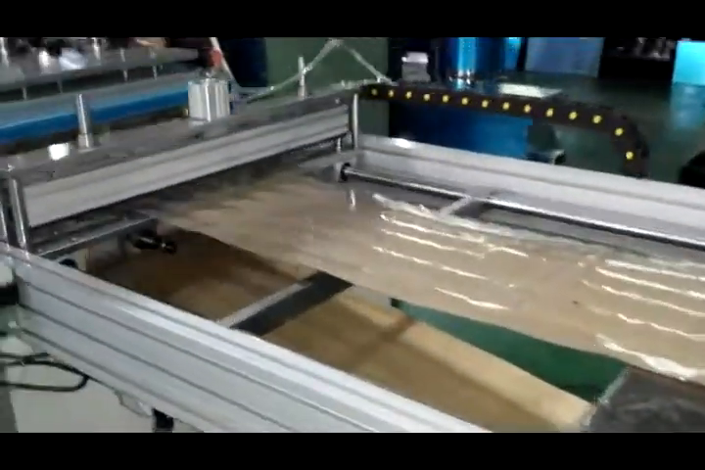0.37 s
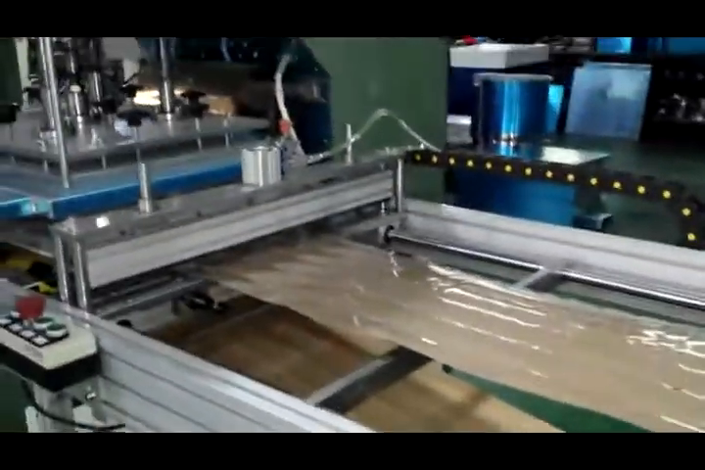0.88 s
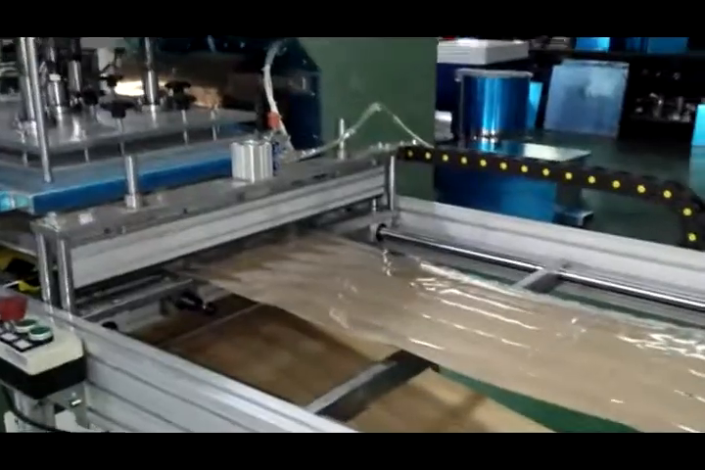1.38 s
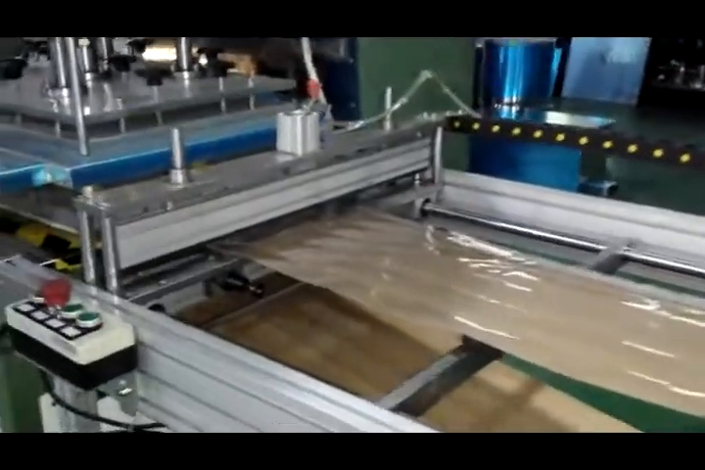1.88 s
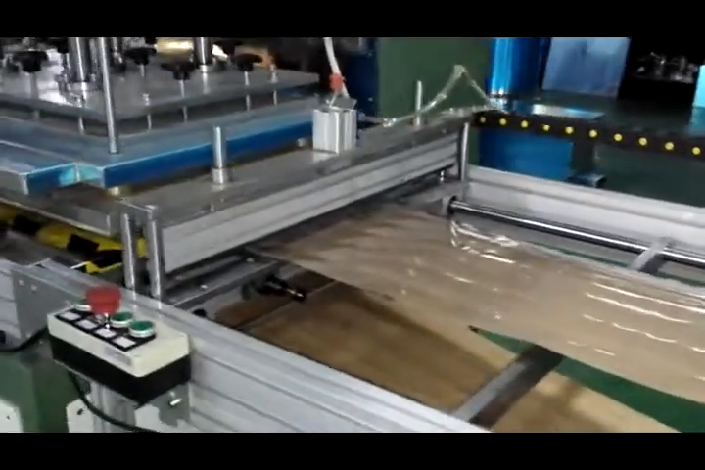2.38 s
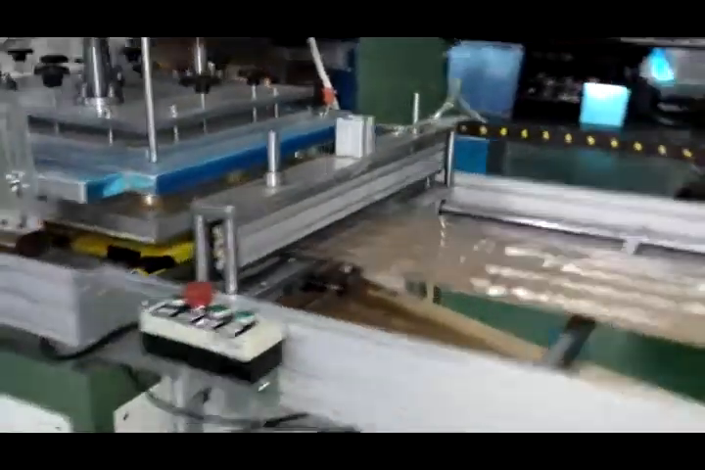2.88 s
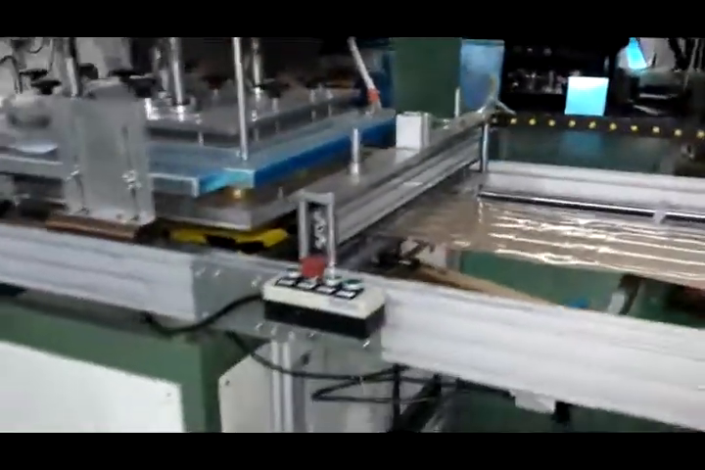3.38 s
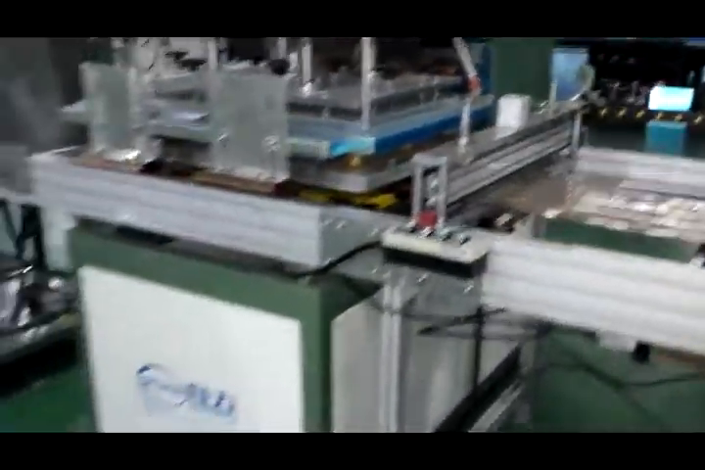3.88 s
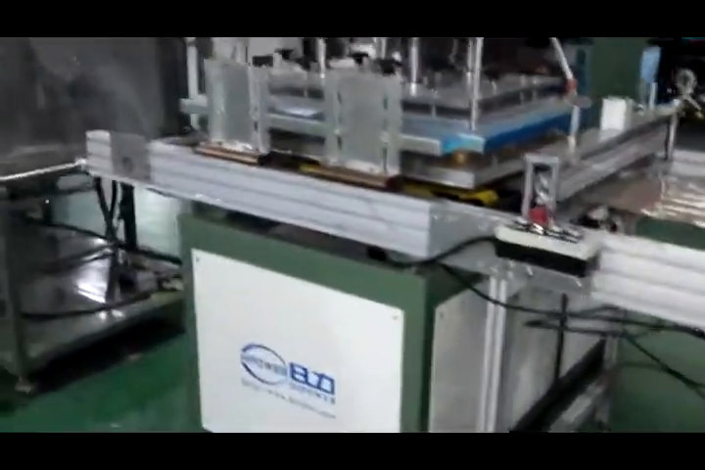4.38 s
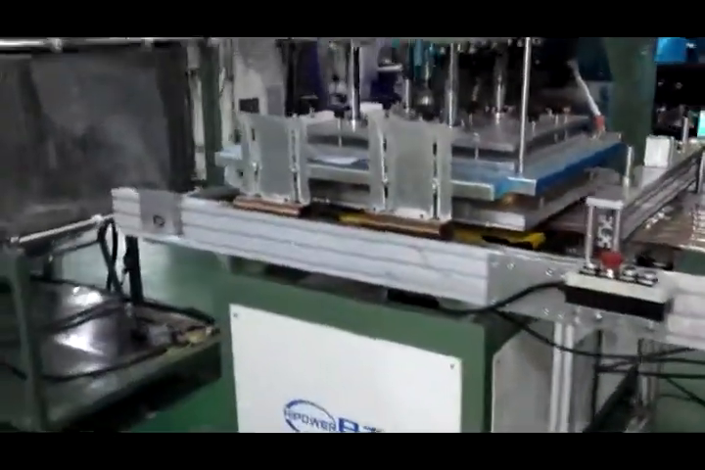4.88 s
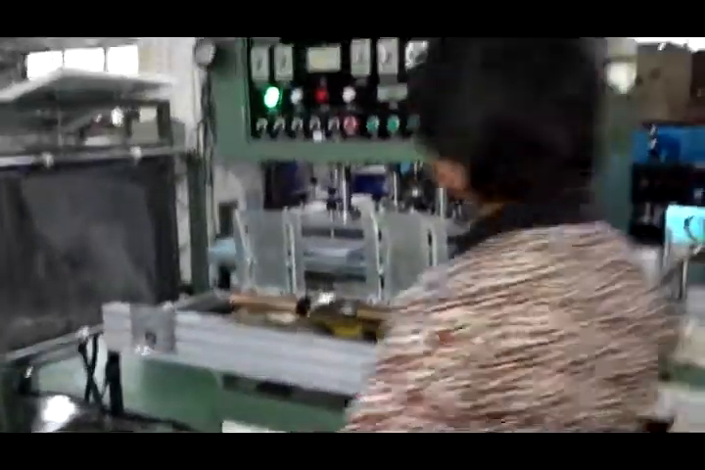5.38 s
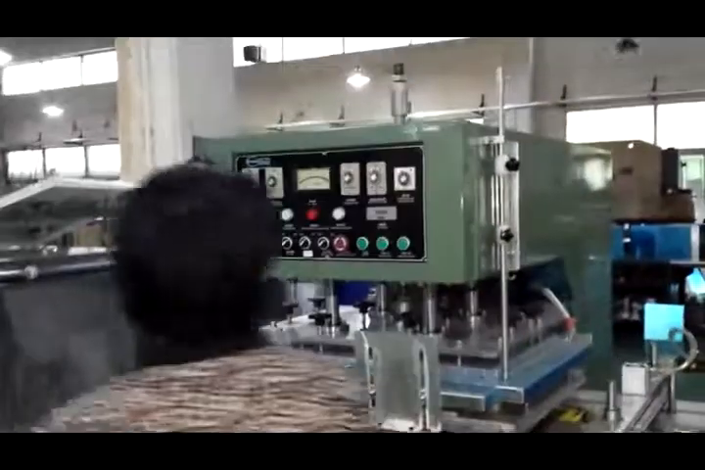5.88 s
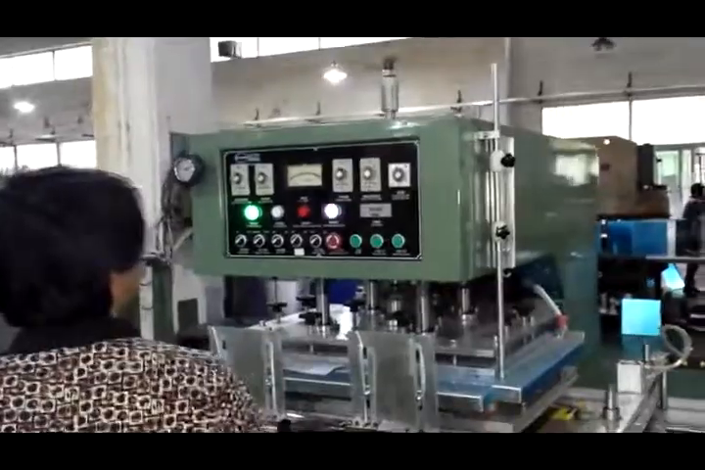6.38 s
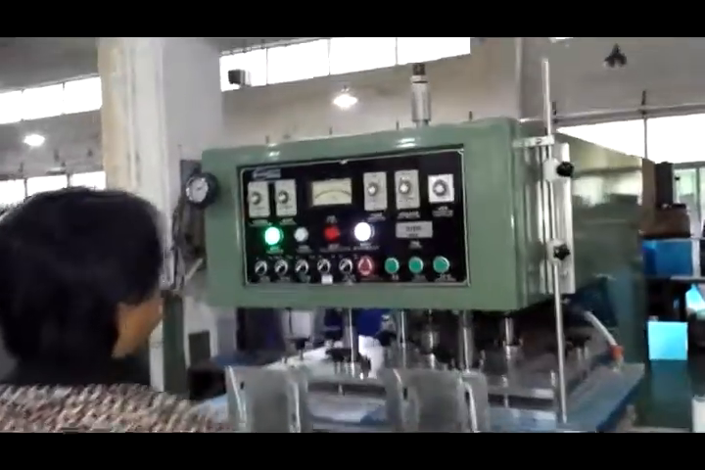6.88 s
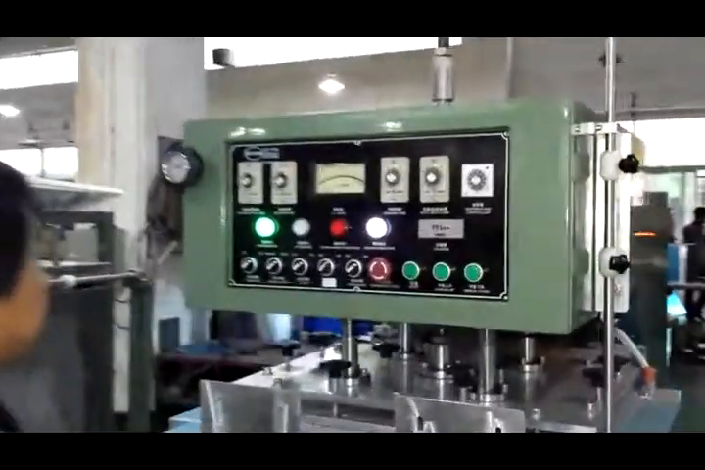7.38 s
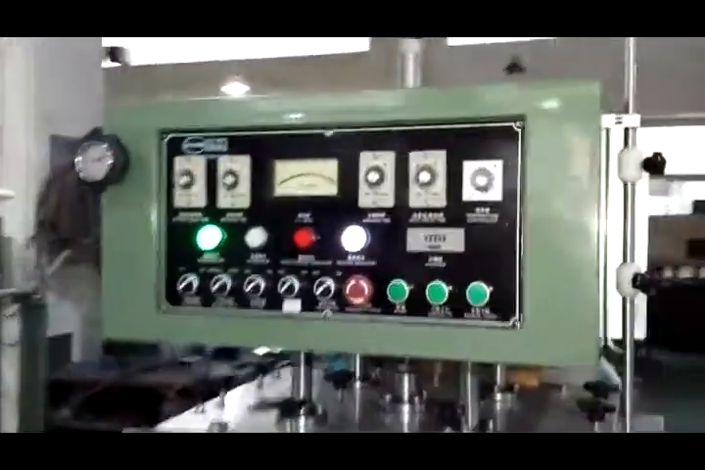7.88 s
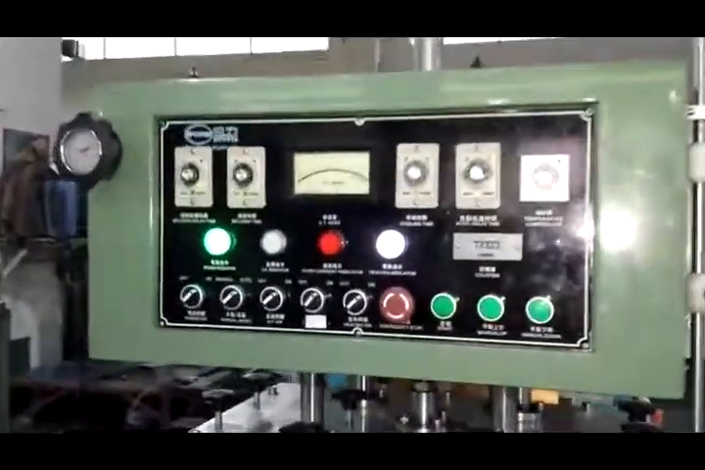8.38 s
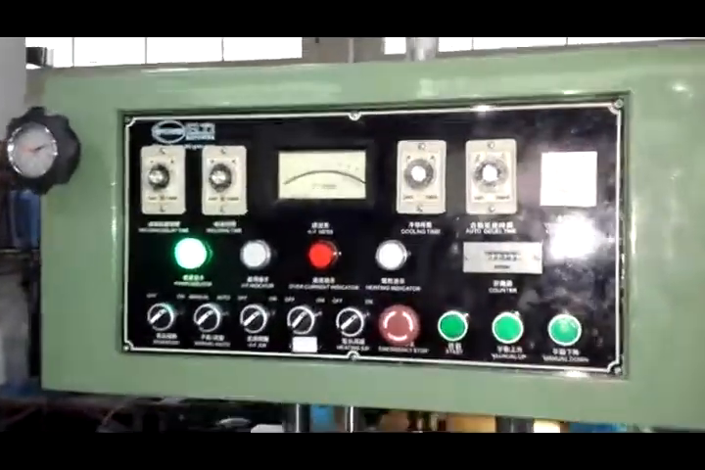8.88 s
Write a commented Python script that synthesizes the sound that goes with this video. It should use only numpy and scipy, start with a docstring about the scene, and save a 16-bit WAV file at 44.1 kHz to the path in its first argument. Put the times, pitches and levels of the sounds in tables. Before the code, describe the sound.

A loud, bright compressed-air hiss fills the foreground from the start, wavering slightly and leaning left, over the dark rumble of distant machines in a large workshop and a faint wavering mid-low motor whine. Short dull steel knocks come unevenly at about 1.0, 1.4, 1.9, 2.5 and 2.9 seconds. At 4.3 a firmer knock rattles on for nearly a second, with a soft air puff at 4.5; a lower clunk rattles at 5.2. Around 6.2 to 6.4 the hiss dips and sharp valve bursts spit, with low thumps. It turns sizzlier after 7, then from 7.3 to 8.0 a rough stick-slip cylinder groan swells as the air dies. From 8.0 to 8.6 mostly rumble and whine remain. At 8.65 a solid clunk lands, the hiss snaps back, and a brief lower groan follows through to the end at 9. Small resonant microphones make it brittle.

```python
"""A hiss of compressed air from a forming press comes first; it nearly stops for a moment, then starts again.
Place: a large workshop. The hiss is coloured noise, with bursts of air added by valve puffs.
Under it: dull knocks ringing the modes of a steel frame, a cylinder groaning as its seal sticks and slips,
a motor whine of wavering tones, and the hall rumble of far machines, a dark noise.
Two small microphones, each behind a port with a resonance of its own; peaks beyond full scale are clipped."""
import sys
import numpy as np
from scipy import signal
from scipy.fft import rfft, irfft
from scipy.io import wavfile
from scipy.ndimage import uniform_filter1d

SR = 44100
rng = np.random.default_rng(int(sys.argv[2]) if len(sys.argv) > 2 else 0)


def digitize_waveform(pressure):
    """Quantize a signal to 16-bit integers and store it at the path in sys.argv[1].

    Rows of a 2-D input are taken as channels; values are limited to [-1, 1].
    """
    field = np.atleast_2d(pressure).T
    bounded = np.clip(field, -1, 1)
    quanta = np.round(bounded * 32767).astype(np.int16)
    wavfile.write(sys.argv[1], SR, quanta)


def volts(x):
    """Linear amplitude factor 10**(x/20) for a level x in dB, scalar or array-like."""
    e = np.asarray(x, float) / 20
    return 10 ** e


N = 396900   # samples, 9 s

# Levels are those ahead of the microphone ports.
# Air jet, falters before a puff, shuts and reopens: time_s, hiss_db, top_treble_db (relative to the hiss)
JET_FLOW = [(0.0, -14, -0.5), (0.6, -15.5, -0.3), (1.35, -13.5, 0), (2.3, -16, 0), (2.7, -14.5, 0),
            (3.85, -16.3, -0.5), (4.5, -15, 0), (5.8, -16.5, 0), (6.16, -15.5, 0.5), (6.21, -18, 0),
            (6.24, -16.5, 2), (6.47, -15, -0.5), (6.64, -15.5, -2.5), (7.12, -17, 4), (7.5, -14.5, 3.5),
            (7.64, -16, 2), (7.72, -18, -7), (8.07, -29.5, -4), (8.4, -31.5, -2), (8.64, -25, -3),
            (8.7, -16.5, 0), (9.0, -16.5, -2)]
# Spectrum of the jet: frequency_hz, density_db (per Hz, relative)
JET_SPECTRUM = [(700, -21), (1600, -14.5), (1900, -7), (2600, -5), (3600, -4.5), (3850, -3.5), (5500, -4),
                (7000, -3.5), (8500, -1.5), (10500, -1), (12500, 2), (14500, 1.5)]
# Bearing of the jet: time_s, left_over_right_db
JET_BEARING = [(0, 3), (1.5, 3.5), (2.5, 2), (4.2, 1.5), (6.0, 2.5), (6.6, 3), (7.4, 2.5), (8.0, 4.5),
               (8.6, 2), (8.7, 1.5), (9, 3)]
# Valve puffs: start_s, level_db (before the decay), centre_hz, width_hz, t60_s
VALVE_PUFFS = [(4.52, -25, 2600, 1500, 1.1), (6.215, -16, 8600, 4000, .3), (6.43, -20.5, 5440, 400, 0.5),
               (6.43, -27.5, 3120, 2500, 1.3), (7.2, -30, 13200, 1200, 1.5), (7.55, -26, 2310, 1500, 1.75)]
# Knocks on the frame: start_s, blow_db (relative), struck_part_hz, rattle_t60_s
FRAME_BLOWS = [(0.98, -22, 900, 0.23), (1.385, -31, 145, .2), (1.93, -22, 890, .2),
               (2.468, -17, 1020, 0.32), (2.52, -29, 900, 0.27), (2.51, -23, 250, .15),
               (2.939, -15, 830, .15), (4.261, -25.5, 436, 0.89), (4.285, -15, 680, 0.81),
               (5.21, -18.5, 268, 1), (6.17, -27, 170, .3), (6.358, -22, 120, 0.25), (7.52, -31, 500, 0.33),
               (8.648, -22, 150, 0.6), (8.652, -15.5, 328, 0.21), (8.655, -18, 760, .15),
               (8.949, -29, 890, .15)]
# Steel frame modes: pitch_hz, level_db (relative), t60_s
FRAME_MODES = [(102, 2, .2), (135.5, 5.5, 0.13), (203, -11, .18), (267, -9.5, 0.28), (303, 0, 0.1),
               (404, 6.5, 0.11), (460, -4, 0.14), (595, -4.5, 0.067), (740, -1, 0.048), (835, -4.5, 0.084),
               (957, 0.5, 0.089), (1100, -1, 0.064), (1040, -1, .06), (1380, -5, .05)]
# Cylinder strokes, one list each: time_s, slips_per_s, level_db (rms), upper_resonances_db (relative)
CYLINDER_STROKES = [
    [(7.3, 218, -42, 7), (7.45, 230, -38, -1), (7.58, 216, -30.5, 4.5), (7.75, 204, -32.5, 2),
     (7.92, 213, -32, 3), (8.0, 204, -53, 2)],
    [(8.7, 128, -57, -3), (8.775, 125, -25, -16), (8.825, 129, -23, -6), (8.85, 129, -40, -4),
     (9.0, 130, -34, -14)],
]
# Barrel resonances: pitch_hz, width_hz, level_db (relative)
BARREL_RESONANCES = [(216, 29, -5), (263, 42, 2), (384, 54, -10), (908, 180, -1.5), (1000, 60, -4),
                     (2140, 170, -6)]
# Motor whine: time_s, level_db (rms of the upper tone, before its waver)
WHINE_LEVEL = [(0, -59), (2.1, -53.5), (2.2, -44.5), (2.9, -43.5), (3.1, -50), (3.75, -43), (3.9, -47.5),
               (4.5, -46.5), (5.9, -50), (6.7, -45), (6.9, -51), (7.65, -55), (7.8, -43), (8.4, -51),
               (9.0, -41)]
# Hall rumble: time_s, level_db, brightness_db_per_octave, lowest_band_db (its chance level, relative)
HALL_LEVEL = [(0, -33.5, 0.75, -3), (2.4, -36.5, 1.1, 5), (3.2, -34, 0.85, 1), (4.6, -35.5, 0.2, -3),
              (4.9, -37.5, 0.5, 8), (5.4, -34.5, .4, -3), (5.74, -36, -0.5, -18), (6.1, -34, 0.2, 4),
              (6.24, -35.5, -1.5, -10), (6.45, -33, -.5, -3), (6.9, -34.5, 0, -7), (7.3, -34.5, -1.1, -2),
              (7.52, -34.5, 3, 5), (7.8, -34, 2.5, 3), (8.0, -37, 0.4, 5), (8.6, -35.5, -0.6, 4),
              (8.67, -28.5, -1, -3), (9.0, -29.5, 0, 3)]
# Spectrum of the rumble: frequency_hz, density_db (per Hz, relative)
HALL_SPECTRUM = [(25, -22), (45, -21), (60, -19), (100, -2), (250, -3), (400, -6), (800, -7), (1500, -8),
                 (3000, -21)]
# Likeness of the noise at the two microphones: frequency_hz, correlation (0 to 1)
MICROPHONE_LIKENESS = [(25, .2), (60, .65), (180, 1), (530, 0.49), (1100, 0.056), (4710, 0.038),
                       (14000, .01)]
# Depth of the random patches laid over the mixed noises, part of no source: frequency_hz, depth_db (spread)
PATCH_DEPTH = [(100, 2), (600, 5.5), (1500, 3), (4000, 3), (8000, 2.5), (13000, 4)]
# Microphone ports, left then right: resonance_hz, sharpness_q, gain_db (well below the resonance)
MICROPHONE_PORTS = [(5760, 3.05, 3.5), (7750, 6.5, 2.5)]


def rms_one(x):
    """Scales a signal to an rms of 1."""
    return x / np.sqrt(np.mean(x ** 2) + 1e-20)


def in_time(rows):
    """Draws each column of a table as straight lines through its times."""
    time_s, *columns = np.transpose(rows)
    return [np.interp(np.arange(N) / SR, time_s, column) for column in columns]


def at_hz(points, hz):
    """Reads a table at the given frequencies, along a log frequency axis."""
    table_hz, values = np.array(points).T
    return np.interp(np.log(hz), np.log(table_hz), values)


def drift(corner_hz):
    """Slow chance of spread 1: coarse noise through a double one-pole low-pass."""
    step = 40   # samples between coarse points
    settle = 2000   # coarse points dropped while the filter settles
    r = np.exp(-2 * np.pi * corner_hz * step / SR)
    coarse = rng.standard_normal(N // step + 2 + settle)
    slow = signal.lfilter([1], [1, -2 * r, r * r], coarse)[settle:]
    return np.interp(np.arange(N) / step, np.arange(len(slow)), rms_one(slow))


def resonate(x, hz, width_hz):
    """Two-pole resonance with gain 1 on top."""
    r = np.exp(-np.pi * width_hz / SR)
    feed = np.array([1, 0, -1]) * (1 - r * r) / 2
    return signal.lfilter(feed, [1, -2 * r * np.cos(2 * np.pi * hz / SR), r * r], x + 1e-18)


def octave_bands(colour, centres):
    """Stereo noise of the given colour and likeness, in overlapping bands that add up to the whole."""
    hz = np.maximum(np.arange(N // 2 + 1) * SR / N, 10)
    mid, side = rfft(rng.standard_normal((2, N)))
    alike = np.clip(at_hz(MICROPHONE_LIKENESS, hz), 0, 1)
    pair = np.sqrt(1 + alike) * mid + np.sqrt(1 - alike) * side * [[1], [-1]]
    pair = volts(at_hz(colour, hz)) * pair
    pair = pair / np.sqrt(np.mean(irfft(pair, N) ** 2))
    shares = [np.interp(np.log(hz), np.log(centres), row) for row in np.eye(len(centres))]
    return [irfft(pair * share, N) for share in shares]


def dying(start_s, t60_s, rise_s):
    """Envelope that starts, rises briefly and dies away exponentially."""
    t = np.maximum(np.arange(N) / SR - start_s, 0)
    return (1 - np.exp(-t / rise_s)) * volts(-60 * t / t60_s)


def panned(x, left_db):
    """Sets left over right by left_db, shared equally between the two microphones."""
    return x * volts(np.multiply.outer([.5, -.5], left_db * np.ones(N)))


def air_jet(flutter_db=0.18, patchy_db=0.42, wander_db=0.3):
    """Turbulent hiss; the flow wanders and flutters as a whole and each band a little on its own."""
    hiss_db, top_db = in_time(JET_FLOW)
    left_db, = in_time(JET_BEARING)
    full_flow_db = -15
    dull_rise = 0.33   # dB that the dull part gains on the rest for each dB below full flow
    low_db = dull_rise * (full_flow_db - hiss_db)
    together_db = flutter_db * drift(23.0) + wander_db * drift(2.7)
    bands = octave_bands(JET_SPECTRUM, np.array([1500, 2800, 5500, 8000, 12000]))
    bands[0] = panned(bands[0], 6.0)   # the dull part arrives more from the left
    jet = 0
    for band, shift_db in zip(bands, [low_db, low_db, 0, 0, top_db]):
        jet = jet + band * volts(shift_db + together_db + patchy_db * drift(7.3))
    return panned(jet * volts(hiss_db), left_db + 0.54 * drift(6.5))


def valve_puffs():
    """Short extra bursts of air: noise that dies away, each coloured by its outlet."""
    puffs = np.zeros((2, N))
    for start_s, level_db, hz, width_hz, t60_s in VALVE_PUFFS:
        air = rms_one(resonate(rng.standard_normal((2, N)), hz, width_hz))
        puffs += volts(level_db) * dying(start_s, t60_s, 0.011) * air
    return puffs


def frame_knocks(reach_octaves=0.14, rattle_per_s=500):
    """Each knock is a blow and a dying rattle; it rings the modes nearest the part struck."""
    start_s, blow_db, part_hz, _ = np.transpose(FRAME_BLOWS)
    hits = np.round(start_s * SR).astype(int)
    rattle = (rng.random(N) < rattle_per_s / SR) * rng.standard_normal(N)
    envelopes = [volts(db) * dying(s, t60_s, 0.0019) for s, db, hz, t60_s in FRAME_BLOWS]
    knocks = np.zeros((2, N))
    for hz, level_db, t60_s in FRAME_MODES:
        near = np.exp(-.5 * (np.log2(hz / part_hz) / reach_octaves) ** 2)
        drive = 0.16 * rattle * (near @ envelopes)
        drive[hits] += 0.32 * near * volts(blow_db)
        r, w = volts(-60 / (t60_s * SR)), 2 * np.pi * hz / SR
        ring = signal.lfilter([0, np.sin(w)], [1, -2 * r * np.cos(w), r * r], drive + 1e-18)
        knocks += panned(volts(level_db) * ring, rng.normal(.5, 2.1))   # each mode from its own side
    return signal.sosfilt(signal.butter(2, 70, "high", fs=SR, output="sos"), knocks)


def cylinder(jitter=.012, rough=0.52):
    """Nearly even slips of the seal, mixed with rubbing noise, ring in the barrel."""
    out = np.zeros(N)
    for stroke in CYLINDER_STROKES:
        per_s, level_db, upper_db = in_time(stroke)
        count = np.floor(np.cumsum(per_s * (1 + jitter * drift(30.0))) / SR)
        slips = np.diff(count, prepend=0) * volts(3.7 * rng.standard_normal(N))   # uneven in strength
        drive = rms_one(slips) + rough * rng.standard_normal(N)
        rings = []
        for k, (hz, width_hz, db) in enumerate(BARREL_RESONANCES):
            ring = resonate(resonate(drive, hz, 2 * width_hz), hz, width_hz)
            rings.append(volts(db) * ring * (-1) ** k)   # neighbours in opposite phase
        groan = sum(rings[:3]) + volts(upper_db) * sum(rings[3:])
        begun = np.arange(N) > stroke[0][0] * SR
        out += rms_one(groan) * volts(level_db) * begun
    return panned(out, 1.3)


def motor_whine(waver_db=2.0):
    """A wavering tone with a weaker one an octave below; a second, fainter hum comes and goes."""
    whine_hz, half_db = 362.5, -4   # half_db: lower tone, relative
    hum_hz, hum_db = 254, -55   # rms, before its drift
    level_db, = in_time(WHINE_LEVEL)
    turn = 2 * np.pi * np.cumsum(whine_hz * (1 + 0.003 * drift(3.8))) / SR
    tone = volts(waver_db * drift(7.0)) * np.sin(turn)
    tone = tone + volts(half_db + 2.4 * drift(5.0)) * np.sin(turn / 2)
    hum_turn = 2 * np.pi * np.cumsum(hum_hz * (1 + 0.0085 * drift(4.4))) / SR
    hum = volts(hum_db + 4.0 * drift(2.3)) * np.sin(hum_turn)
    return panned(np.sqrt(2) * (volts(level_db) * tone + hum), 1.8)


def hall_rumble(patchy_db=1.18, chance_db=5.5, swell_db=1.2):
    """Far machines blurred by the hall; the whole swells, the lowest band swells and fades at random."""
    level_db, tilt_db, lowest_db = in_time(HALL_LEVEL)
    centres = np.array([60, 125, 250, 500, 1000])
    bands = octave_bands(HALL_SPECTRUM, centres)
    bands[0] = bands[0] * volts(lowest_db + chance_db * (drift(3.2) + 0.3))
    rumble = 0
    for band, hz in zip(bands, centres):
        rumble = rumble + band * volts(tilt_db * np.log2(hz / 250) + patchy_db * drift(7.5))
    return panned(rumble * volts(level_db + swell_db * drift(2.4)), 0.33)


def random_patches(x, size=2048, patch_hz=50):
    """Random gains on narrow patches of the spectrum, new at each moment and apart in each channel."""
    hz, _, cells = signal.stft(x, fs=SR, nperseg=size)
    width = max(1, round(patch_hz * size / SR))   # in frequency cells
    patches = uniform_filter1d(rng.standard_normal(cells.shape), width, axis=1)
    depth_db = at_hz(PATCH_DEPTH, np.maximum(hz, 10))[:, None]
    gain = volts(depth_db * rms_one(patches))
    return signal.istft(cells * gain, fs=SR, nperseg=size)[1][:, :N]


def scene():
    """All sources mixed; random patches, part of no source, are laid over the jet, puffs and rumble."""
    noise = random_patches(air_jet() + valve_puffs() + hall_rumble())
    return noise + frame_knocks() + cylinder() + motor_whine()


def band_limit(x):
    """A steep low-pass at the top of the band."""
    return signal.sosfilt(signal.butter(12, 14610, fs=SR, output="sos"), x)


def record(dry):
    """Each port is a cavity resonance, flat below and falling above; then a treble cut and overload."""
    hz = np.arange(N // 2 + 1) * SR / N
    ports = np.array([volts(gain_db) / (1 - (hz / port_hz) ** 2 + 1j * hz / port_hz / q)
                      for port_hz, q, gain_db in MICROPHONE_PORTS])
    heard = irfft(rfft(dry) * ports * (hz < 14620), N)   # nothing passes above 14620 Hz
    mix = np.clip(heard, -1.0, 1.0)
    return band_limit(mix)


dry = scene()
out = record(dry)
digitize_waveform(out)
```